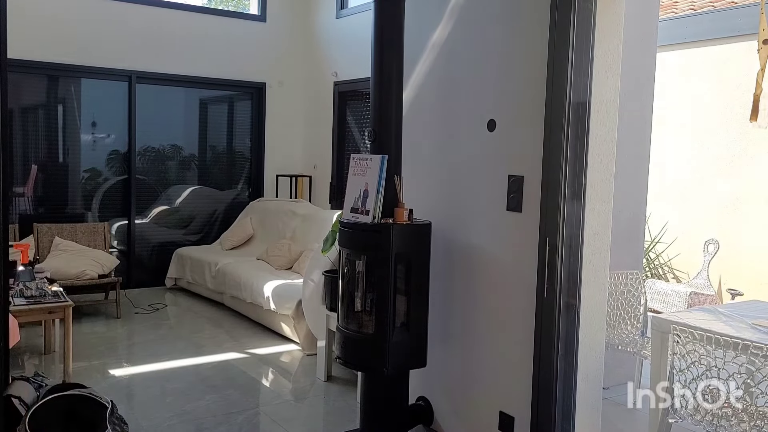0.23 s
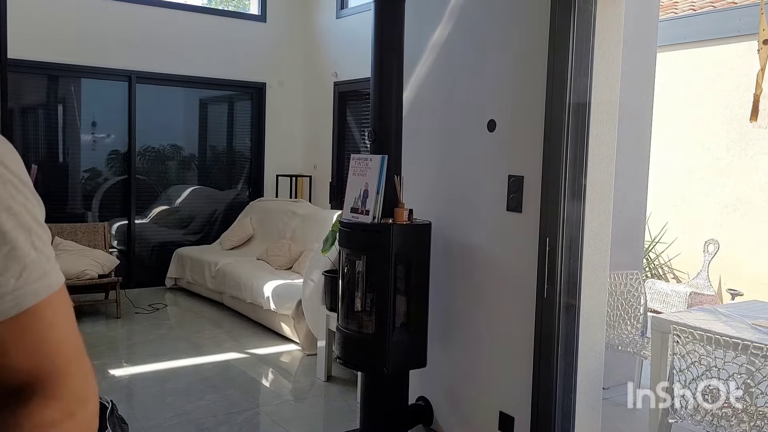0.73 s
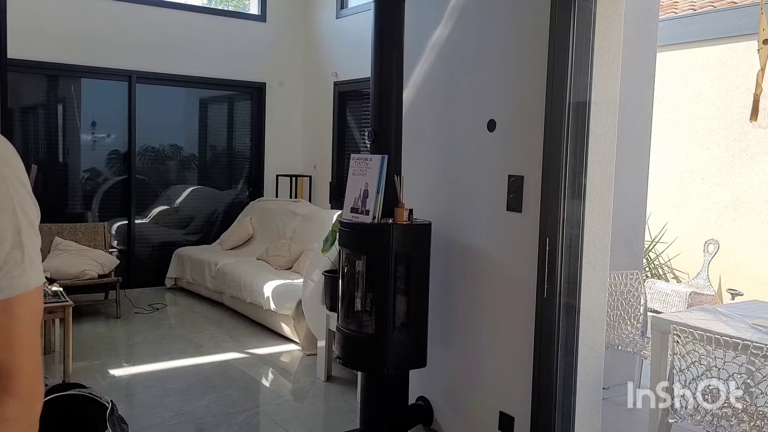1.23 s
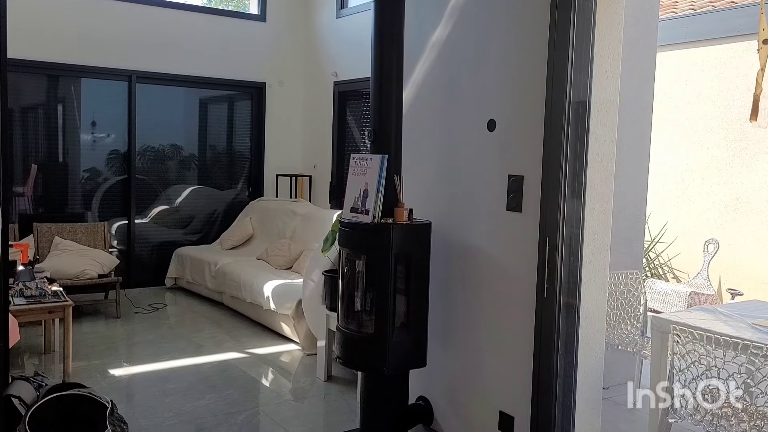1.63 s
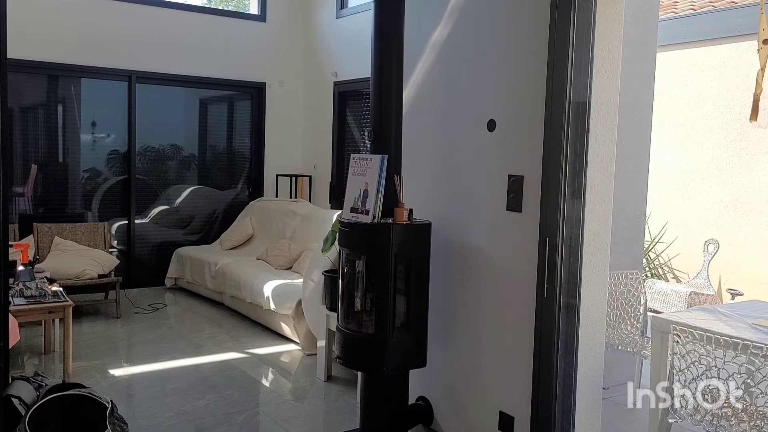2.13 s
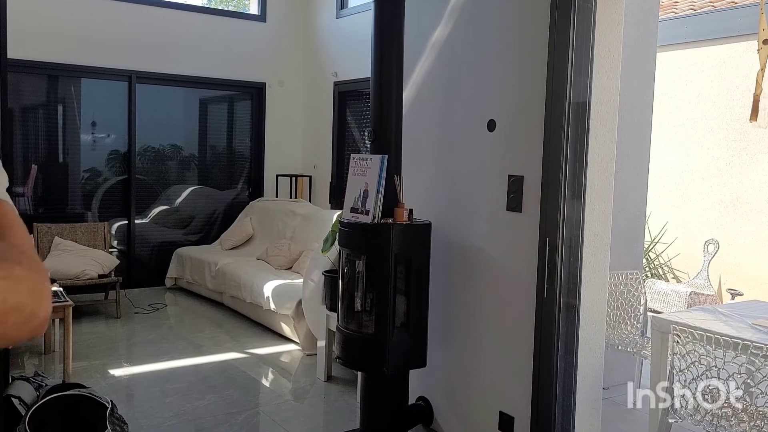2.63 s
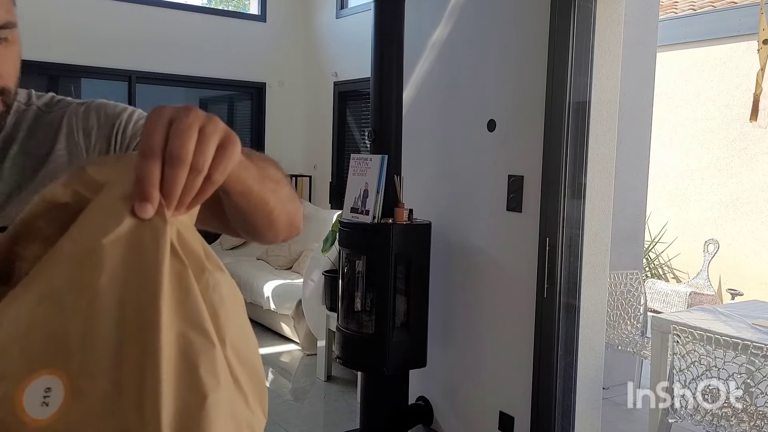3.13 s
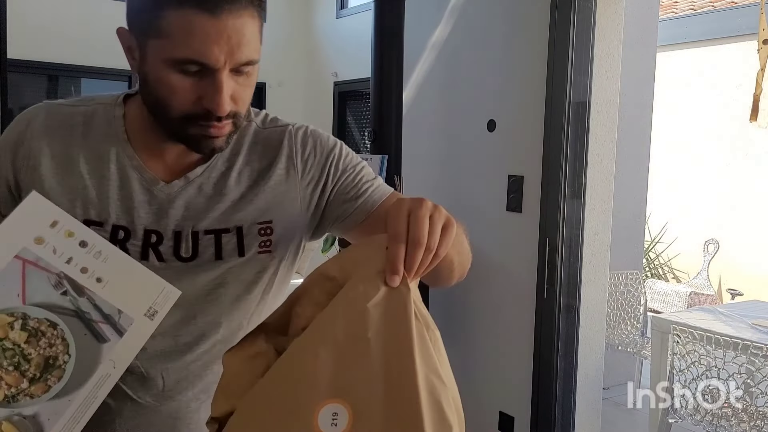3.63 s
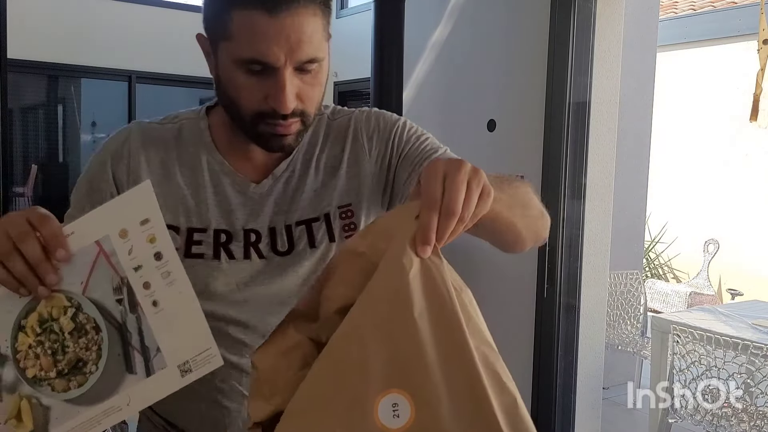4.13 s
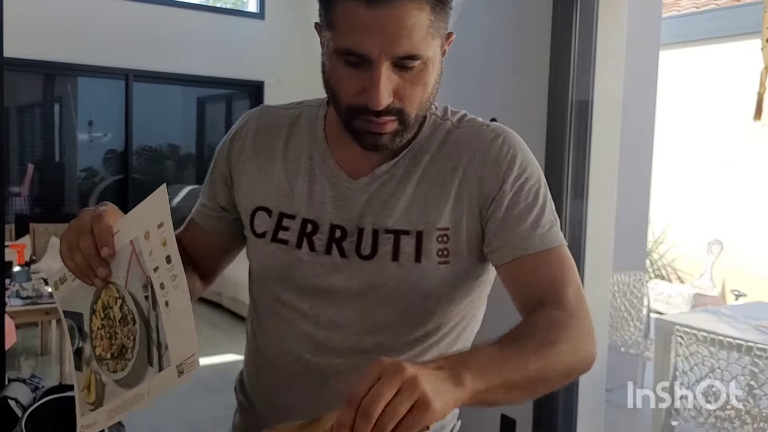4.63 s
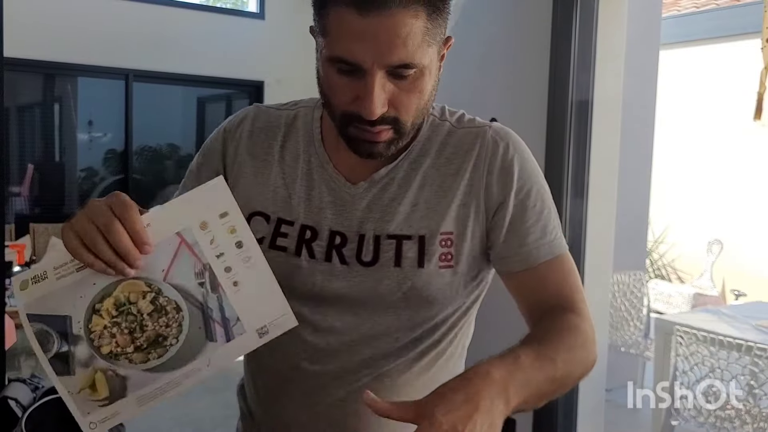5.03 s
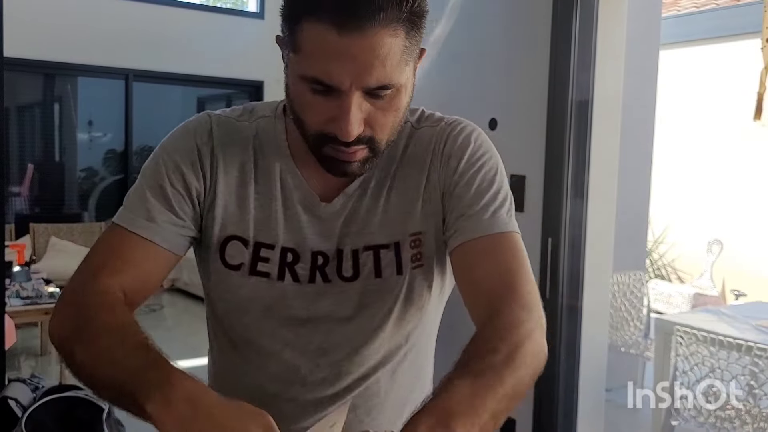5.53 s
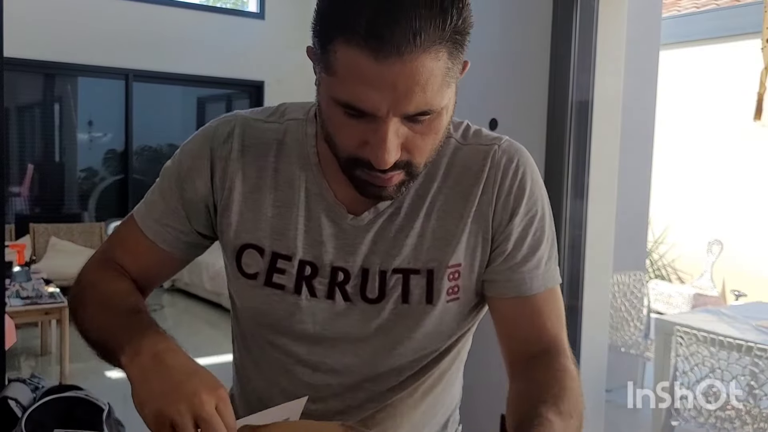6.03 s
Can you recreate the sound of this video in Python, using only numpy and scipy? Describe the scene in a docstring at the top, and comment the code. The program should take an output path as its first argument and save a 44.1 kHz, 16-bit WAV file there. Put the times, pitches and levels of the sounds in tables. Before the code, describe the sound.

A big stiff paper bag is handled near a phone in a tiled living room. Lively crackles and hissing rubs come from the left, then thin out into a near-silent lull. Soft creases return, moving to the centre, growing into a loud, hollow crumple as the bag is put down, followed by shorter rummaging rustles.

```python
"""A tiled living room: a stiff paper bag is lifted, carried past, set down and rummaged close to a phone.
Creases snap and crackle (short noise bursts), sheets rub and hiss (shaped noise), and the walls
of the bag flex and boom (resonances) or pop (short swings). The room answers with fading noise echoes.
The bag starts at the left of the two microphone ports and ends in front of them; a quiet hush lies below."""
import sys
import numpy as np
from scipy import signal
from scipy.fft import rfft, irfft, next_fast_len
from scipy.io import wavfile
from scipy.ndimage import uniform_filter1d, map_coordinates

SR = 44100
rng = np.random.default_rng(int(sys.argv[2]) if len(sys.argv) > 2 else 0)


def file_out(sig):
    """Save sig as 16-bit WAV at sys.argv[1]."""
    # one column per channel
    cols = np.atleast_2d(sig).T
    # limit, then scale
    lim = np.clip(cols, -1, 1)
    pcm = np.round(lim * 32767).astype(np.int16)
    wavfile.write(sys.argv[1], SR, pcm)


N = 277276


def amp(db):
    """Turn decibels into a plain multiplier."""
    return 10 ** (np.asarray(db) / 20)


def unit(x):
    """Scale a signal to an average (RMS) strength of one."""
    return x / np.sqrt(np.mean(x ** 2) + 1e-20)


def along(points, hz):
    """Read a curve of (f/Hz, value) points, joined by lines on a logarithmic pitch axis."""
    f, v = np.transpose(points)
    return np.interp(np.log(hz + 1), np.log(f + 1), v)


def curves(rows):
    """Give one value per sample for each column after the time."""
    s, *columns = np.transpose(rows)
    return [np.interp(np.arange(N) / SR, s, column) for column in columns]


def wobble(rate):
    """Draw a smooth random curve with `rate` random points a second."""
    knots = rng.standard_normal(int(N * rate / SR) + 4)
    return map_coordinates(knots, [np.arange(N) * rate / SR])


def filtered(x, response):
    """Multiply the spectrum of x by a response that depends on frequency."""
    m = next_fast_len(N + SR // 2)  # spare room at the end for ringing
    return irfft(rfft(x, m) * response(np.fft.rfftfreq(m, 1 / SR)), m)[..., :N]


def peak(f, hz, width):
    """One resonance: it passes sound near its own pitch and rings on afterwards."""
    return 1j * f * width / (hz * hz - f * f + 1j * f * width)


def diffuse(pair):
    """Mix two unrelated signals so they are alike in the bass, as at two ports close together."""
    # likeness of left and right: f/Hz, correlation (1 = the same, 0 = unrelated)
    likeness = [(60, 0.77), (290, 0.86), (640, 0.39), (1400, 0), (3000, 0)]

    def turn(f):
        return np.arccos(np.clip(along(likeness, f), -1, 1)) / 2

    mid, side = filtered(pair, lambda f: np.array([np.cos(turn(f)), np.sin(turn(f))]))
    return np.array([mid + side, mid - side])


def rustle():
    """Rubbing sheets hiss, small creases crackle, and every crease that gives also jolts the walls."""
    # colour of the rubbing: f/Hz, level/dB
    rub_colour = [(1500, -0.5), (3200, -2.5), (4500, 0.5), (6500, -6), (8500, -3), (12000, -1),
                  (16000, -4.5)]
    # colour of the small creases: f/Hz, level/dB
    crumple_colour = [(300, -29), (700, -8.5), (1100, -1), (2000, -2.5), (3300, -4.5), (5000, -12),
                      (9000, -15)]
    # colour of the push on the walls, before the bag's resonances: f/Hz, level/dB
    flex_colour = [(25, -46), (45, 4), (110, -5), (300, -3), (700, -5.5), (1200, -14.5), (3000, -37)]
    rub_db, flex_db = effort()
    # creasing lies between rubbing and bending; this is its level relative to rubbing
    crumple_db = 0.52 * (flex_db - rub_db) - 1

    def fine(f):
        """Share of rubbing power given to the smallest wrinkles, which tick highest."""
        return 1 / (1 + (7500 / (f + 1)) ** 6)

    # ticks, scuffs and creases each break out at their own moments
    ticks = crackle(rub_db, share=0.0038, spread_db=0.5, life_s=0.00089, bed_db=9.0)
    scuffs = crackle(rub_db, share=0.0035, spread_db=7.5, life_s=0.0022, bed_db=12.0)
    creases = crackle(rub_db, share=0.003, spread_db=6.0, life_s=0.0016, bed_db=0.0)

    high_rub = filtered(ticks, lambda f: amp(along(rub_colour, f)) * fine(f) ** 0.5)
    patchy_scuffs = patchy(scuffs, depth_db=2.5)
    low_rub = filtered(patchy_scuffs, lambda f: amp(along(rub_colour, f)) * (1 - fine(f)) ** 0.5)
    patchy_creases = patchy(creases, depth_db=4.0)
    crumple = filtered(patchy_creases, lambda f: amp(along(crumple_colour, f)))
    flex = filtered(creases, lambda f: amp(along(flex_colour, f)) * boomy(f, broad_db=-3.5))

    paper = unit(high_rub + low_rub) + amp(crumple_db) * unit(crumple)
    return amp(rub_db - 0.5) * paper + amp(flex_db - 3.5) * unit(flex)


def effort():
    """Levels of rubbing and bending: overlapping hand strokes of rise, hold and release add their power."""
    # moves of the hand: t/s, rise/s, hold/s, relative rubbing level/dB, relative bending level/dB
    # (at t the stroke is still rise_db below its top)
    strokes = [(0.023, 0.044, 0.099, -40.5, -37), (0.218, 0.015, 0.042, -46, -39),
               (0.29, 0.091, 0.04, -38.5, -60), (0.462, .01, 0.13, -49, -45.5),
               (0.694, 0.015, 0.024, -39.5, -36.5), (0.783, 0.024, 0.073, -48.5, -42),
               (0.852, 0.0059, 0.13, -47, -44), (1.035, 0.022, 0.027, -55.5, -48.5),
               (1.081, 0.018, 0.048, -46.5, -46.5), (1.163, 0.034, .08, -53.5, -48.5),
               (1.315, 0.024, 0.063, -52.5, -44), (1.448, 0.018, 0.4, -46, -38.5),
               (1.692, 0.035, .18, -44, -33.5), (1.892, 0.017, 0.16, -35, -31.5),
               (2.166, 0.024, 0.045, -61, -37), (2.259, .02, 0.036, -58.5, -40.5),
               (2.36, 0.017, 0.05, -55, -53), (2.46, 0.0052, 0.036, -57, -42), (2.768, .02, .28, -93, -65),
               (3.132, 0.0081, 0.088, -64, -64), (3.326, 0.057, 0.14, -56.5, -50.5),
               (3.5, 0.013, 0.077, -49, -51), (3.618, .01, 0.11, -56, -60), (3.861, .015, 0.028, -74, -47),
               (3.92, .02, 0.071, -70, -46), (4.113, 0.014, 0.11, -58, -41),
               (4.192, 0.031, 0.026, -40, -35), (4.281, .03, 0.044, -42.5, -33),
               (4.42, 0.011, 0.052, -43.5, -35), (4.521, 0.13, 0.12, -32, -25),
               (4.838, 0.0093, 0.13, -46.5, -42), (5.002, 0.0089, 0.066, -48.5, -45.5),
               (5.172, 0.092, 0.065, -57.5, -55), (5.363, 0.0074, 0.12, -40.5, -36),
               (5.455, 0.038, 0.1, -43.5, -25.5), (5.602, 0.076, 0.24, -38.5, -31),
               (5.955, 0.029, 0.16, -44, -43.5), (6.107, 0.014, 0.035, -45.5, -44.5),
               (6.24, .03, .05, -54, -53.5)]
    # the paper settling between strokes: relative rubbing level/dB, relative bending level/dB
    rest_db = [-72.5, -68.5]
    rise_db, sag_db_per_s, release_db_per_s = 8.5, 10.5, 224  # swells, tires while held, lets go
    t = np.arange(0, N / SR + 0.001, 0.001)  # in steps of 1 ms
    s, rise, hold, *levels_db = np.transpose(strokes)
    held = t[:, None] - s - rise  # seconds since the top of each stroke
    sag_db = sag_db_per_s * np.clip(held, 0, hold)
    release_db = release_db_per_s * np.maximum(held - hold, 0)
    shape_db = np.where(held < 0, rise_db * held / (rise + 1 / SR), -(sag_db + release_db))
    # doubling the decibels turns amplitude into power
    power = amp(2 * shape_db) @ amp(2 * np.transpose(levels_db)) + amp(2 * np.array(rest_db))
    return curves(np.column_stack([t, 10 * np.log10(power)]))


def crackle(effort_db, share, spread_db, life_s, bed_db):
    """Two noises share short bursts of uneven size over a smooth bed; harder work crowds the bursts."""
    chance, size = rng.random(N), rng.exponential(size=N)
    crowding = share * amp(0.17 * (effort_db + 47.5) + 3.3 * wobble(14))  # chance of a burst per sample
    burst_size = amp(np.minimum(spread_db * size, 20))
    starts = (chance < crowding) * burst_size / np.sqrt(crowding)
    # the energy of each burst fades to about a third in life_s
    energy = signal.lfilter([1], [1, -np.exp(-1 / (life_s * SR))], starts ** 2)
    return (unit(energy ** 0.5) + amp(bed_db)) * rng.standard_normal((2, N))


def patchy(x, depth_db):
    """Each fold of paper has its own colour: random gain in patches of pitch and time."""
    z = signal.stft(x, nperseg=256)[2]
    field = uniform_filter1d(rng.standard_normal(z.shape[1:]), size=6, axis=0)
    field = uniform_filter1d(field, size=7, axis=1)
    return signal.istft(z * amp(depth_db * unit(field)), nperseg=256)[1][:, :N]


def boomy(f, broad_db):
    """The hollow bag: air and walls resonate at a few pitches over a broad low response."""
    # resonances of air and walls: f/Hz, width/Hz, level/dB
    resonances = [(124.7, 10.6, 5), (285.6, 39, 3), (437, 17, -2.5), (580, 85, -10), (870, 140, -15)]
    modes = sum(amp(db) * peak(f, hz, width) for hz, width, db in resonances)
    return modes + amp(broad_db) * peak(f, 323, 1330)


def snaps():
    """Each single crease giving way makes a short pitched crack and a spit of treble."""
    # creases: t/s, relative level/dB, treble over the crack/dB, pitch of the crack f/Hz
    crease_list = [(0.0635, -20, 0, 3020), (0.0995, -20.5, -13, 3120), (0.1575, -28.5, -16, 3080),
                   (0.2313, -23.5, -26, 3830), (0.3642, -23, -18, 3460), (0.4706, -25.5, -1, 6680),
                   (0.5094, -25.5, 6.5, 3350), (0.5424, -26.5, 5, 3700), (0.709, -33, -4, 1900),
                   (0.8664, -27, 9, 1580), (0.9264, -19, -4, 4330), (1.1452, -21, -28, 2030),
                   (1.5858, -31, -23, 3250), (1.631, -24.5, -28, 2900), (1.734, -22.5, -4, 1960),
                   (1.786, -22.5, 2.5, 3300), (1.8713, -23, -20, 3200), (1.9168, -16.5, 5, 5140),
                   (1.9313, -13, -15, 2750), (2.2286, -20.5, -17, 3120), (2.3122, -28.5, -25, 3280),
                   (2.3194, -28, -25, 2570), (2.382, -32, 5, 3900), (2.4206, -36.5, 4, 1400),
                   (2.4682, -27, -23, 3070), (2.6779, -35, -12.5, 1650), (2.8434, -48, -19, 2630),
                   (2.9486, -49, 6, 1850), (3.143, -40, 8, 1620), (3.1963, -43.5, 3, 2390),
                   (3.2958, -42, -2, 2170), (3.343, -34.5, -17, 1640), (3.5145, -24, -15, 1870),
                   (3.5798, -35, -22, 1570), (3.6915, -34, -3, 1450), (3.726, -32.5, 1.5, 1400),
                   (4.0061, -27.5, -35, 1370), (4.0143, -33.5, -25, 2200), (4.1254, -26.5, -22, 2130),
                   (4.156, -23.5, -28, 1500), (4.2074, -20.5, -22, 1680), (4.3655, -27.5, 6, 2400),
                   (4.4404, -19.5, -2.5, 1560), (4.578, -16, -19, 2860), (4.65, -21, -3, 2400),
                   (4.719, -16, -25, 2260), (4.989, -23.5, -20, 2460), (5.023, -21.5, 0, 1480),
                   (5.3664, -24, -2, 2180), (5.3735, -23, -6, 3160), (5.3937, -18.5, 2, 3130),
                   (5.424, -17, -21, 1360), (5.4974, -25.5, 6, 1800), (5.506, -20.5, -2, 6500),
                   (5.5229, -16.5, -18, 1460), (6.122, -22.5, -1, 2880)]
    size = 1024  # samples per snap
    t, f = np.arange(size) / SR, np.fft.rfftfreq(size, 1 / SR)
    # first row the crack, second the treble: both fade by 60 dB in the first time given
    fade = amp(-60 * t / [[0.009], [0.006]])
    onset = 1 - np.exp(-t / [[0.0015], [0.0002]])
    cracks = np.zeros((2, N + size))
    for s, db, treble_db, hz in crease_list:
        noise = rng.standard_normal((2, 2, size)) * fade * onset  # port, part, time
        colour = [peak(f, hz, 1.16 * hz) ** 2, peak(f, 9200, 14000) ** 2]
        burst = irfft(rfft(noise) * colour, size)
        burst = burst / np.abs(burst).max(axis=2, keepdims=True)
        snap = burst[:, 0] + amp(treble_db) * burst[:, 1]
        cracks[:, round(s * SR):][:, :size] += amp(db - 1.0) * snap
    return cracks[:, :N]


def thumps():
    """A popping wall swings for a few cycles; its puff of air sets the hollow bag ringing."""
    # a wall pops in or out: t/s, relative level/dB, pitch f/Hz
    pops = [(0.065, -28.5, 373), (0.238, -27.5, 302), (0.336, -30, 303), (0.707, -27.5, 277),
            (0.774, -28, 140), (1.19, -40, 126), (1.235, -40, 124), (1.331, -37.5, 273), (1.619, -33, 316),
            (1.724, -21, 398), (1.993, -29, 310), (2.206, -28, 286), (2.27, -36, 278), (2.304, -35, 294),
            (2.468, -23, 317), (3.143, -41, 484), (3.35, -37, 124), (3.525, -31.5, 125), (3.867, -37, 422),
            (3.295, -38.5, 467), (3.338, -26, 480), (3.5158, -21.5, 510), (3.607, -38, 286),
            (3.726, -29.5, 600), (3.883, -29.5, 596), (4.005, -29.5, 690), (4.125, -33, 640),
            (4.44, -27, 383), (4.754, -17.5, 450), (5.02, -28.5, 303), (5.365, -29, 800), (5.421, -29, 270),
            (5.779, -22.5, 262)]
    swings, puffs = np.zeros(N + SR), np.zeros(N + SR)
    t = np.arange(SR // 10) / SR
    for s, db, hz in pops:
        cycles = hz * t
        swell = np.exp(-cycles / 1.15) * (1 - np.exp(-cycles / 0.36))
        # a flat sheet also swings at a higher, unrelated pitch
        higher = np.sin(2 * np.pi * rng.uniform(1.276, 1.916) * cycles)
        modes = np.sin(2 * np.pi * cycles) + 0.44 * higher
        start = round(s * SR)
        swings[start:][:len(t)] += amp(db + 5.0) * swell * modes
        puffs[start:][:len(t)] += amp(db + 10.0) * cycles * np.exp(-cycles / 0.2)
    return swings[:N] + filtered(puffs[:N], lambda f: boomy(f, broad_db=-17))


def ports(x):
    """The nearer port hears the bag earlier; the phone's body shades the treble of the other."""
    # where the bag is: t/s, lead of the left port/ms, treble left over right/dB
    place = [(0, 0.28, 7.5), (2, 0.3, 5.5), (2.8, 0.34, 5.5), (3.3, 0.11, 5), (3.8, 0.18, 1.5),
             (4.3, -0.021, 1.5), (5.3, 0.0081, 3.5), (6.3, 0.063, 2.5)]
    # the bag is wide: f/Hz, amplitude share of the sound that differs between ports (0 to 1)
    width_share = [(500, 0), (1500, 0.52), (4000, 0.7), (12000, 0.8)]
    lead_ms, shade_db = curves(place)

    def split(f):
        share = np.clip(along(width_share, f), 0, 1)
        return np.sqrt([1 - share ** 2, share ** 2])

    common, differing = filtered(x, split)
    heard = []
    for side in (0.5, -0.5):  # left, right: half of each difference
        sound = common + np.sign(side) * differing
        low = filtered(sound, lambda f: 1 / (1 + (f / 2500) ** 2))
        shaded = low * amp(side * -1.5) + (sound - low) * amp(side * shade_db)
        moments = np.arange(N) + side * lead_ms * SR / 1000
        heard.append(map_coordinates(shaded, [moments], order=5))
    return np.array(heard)


def room(x):
    """Each frequency of the echo, a tail of noise, dies at its own speed."""
    # echo of the room: f/Hz, time to fade by 60 dB/s
    fade_times = [(120, 0.27), (500, 0.31), (2000, 0.29), (6000, 0.22), (14000, 0.085)]
    # a fresh random echo tail every 2000 samples keeps the echo from ringing at fixed pitches
    wet, step = np.zeros((2, N + 2 * SR)), 2000
    for at in range(0, N, step):
        hz, t, z = signal.stft(rng.standard_normal((2, SR // 4)), SR, nperseg=256)
        fade = amp(-60 * t / along(fade_times, hz)[:, None])
        tail = signal.istft(z * fade, SR, nperseg=256)[1]
        tail = tail / np.linalg.norm(tail[0])
        answer = signal.fftconvolve(x[None, at:at + step], tail, axes=1)
        wet[:, at + SR // 300:][:, :answer.shape[1]] += answer  # echoes start 1/300 s late
    return diffuse(wet[:, :N])


def air():
    """The steady hush of the room and the microphones: noise with a fixed colour."""
    # colour of the hush: f/Hz, level/dB
    hush_colour = [(18, -39), (30, 10), (124, -22), (174, -13), (295, -4), (600, 1.5), (1070, -4),
                   (8300, -46), (16000, -26)]
    hush = filtered(rng.standard_normal((2, N)), lambda f: amp(along(hush_colour, f)))
    return amp(-67.5) * unit(diffuse(hush))


def scene():
    """Add the bag as heard directly, its echo in the room, and the hush."""
    rustling, snapping = rustle() + thumps(), snaps()
    direct = ports(rustling + snapping)
    # snaps and the other sounds each have their own echo level
    echo = room(amp(-6) * rustling[0] + amp(-5.5) * snapping[0])
    return direct + echo + air()


def record(dry):
    """Cut the deepest bass; step the treble down steeply at 15.8 kHz and stop it at 16.8 kHz."""
    roll_hz, top_hz = 15800, 16800

    def response(f):
        bass_cut = (1j * f / (38 + 1j * f)) ** 3
        return bass_cut * np.where(f < roll_hz, 1, amp(-39)) * (f < top_hz)

    return filtered(dry, response)


dry = scene()
out = record(dry)
file_out(out)
```